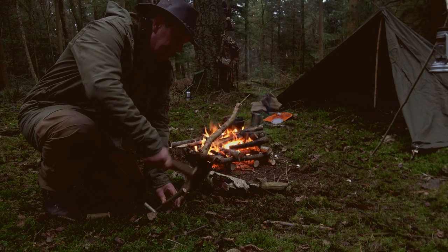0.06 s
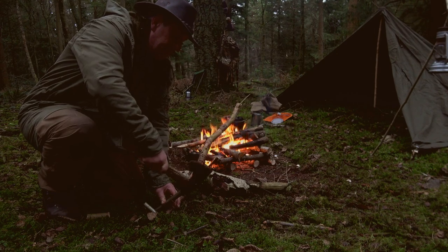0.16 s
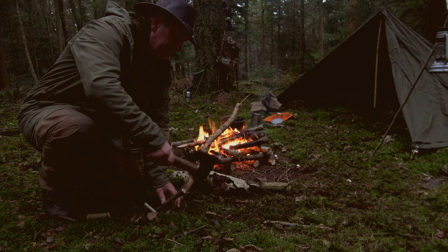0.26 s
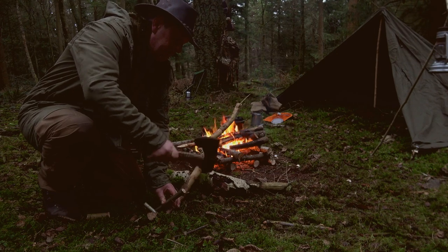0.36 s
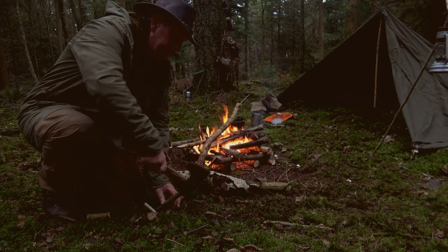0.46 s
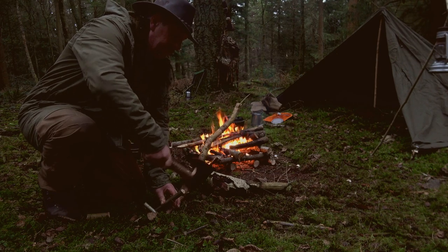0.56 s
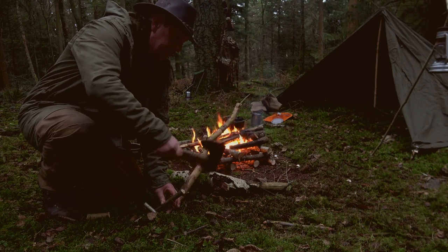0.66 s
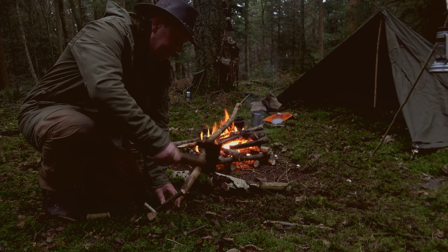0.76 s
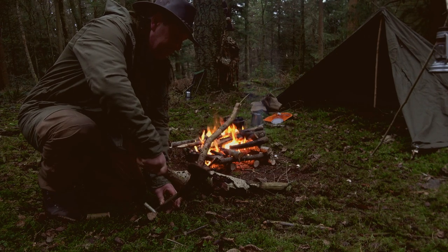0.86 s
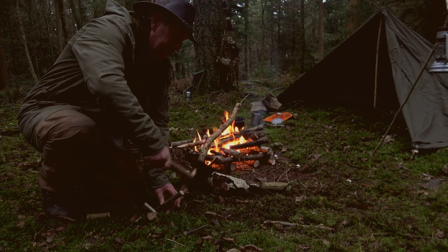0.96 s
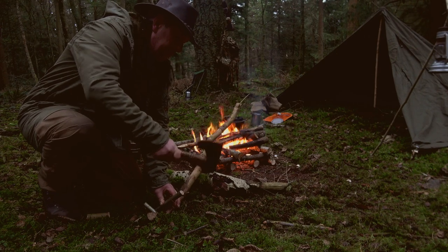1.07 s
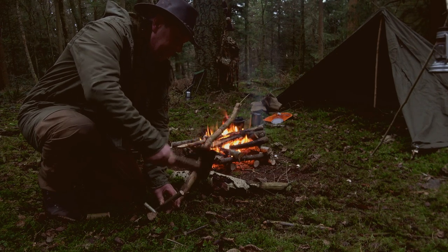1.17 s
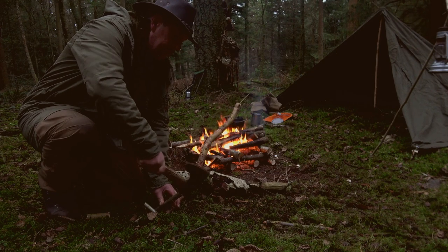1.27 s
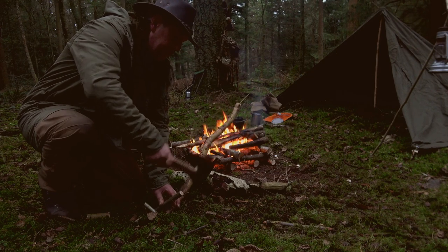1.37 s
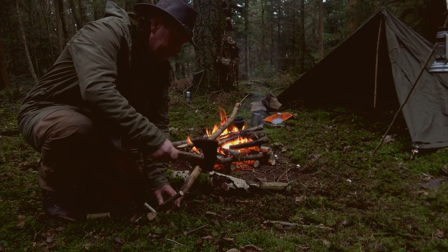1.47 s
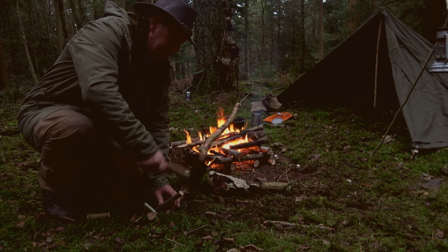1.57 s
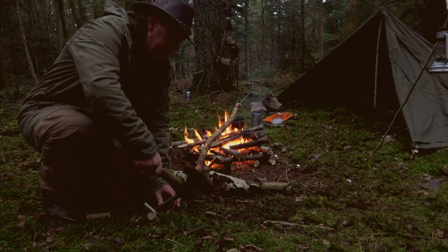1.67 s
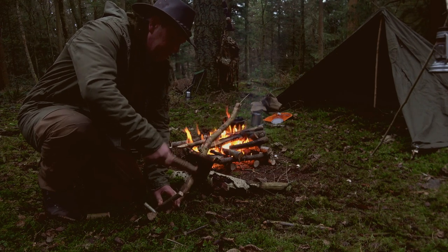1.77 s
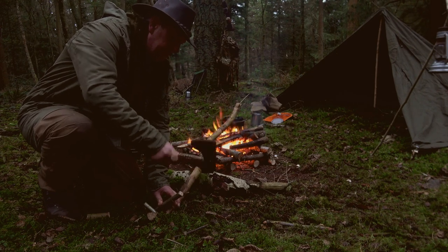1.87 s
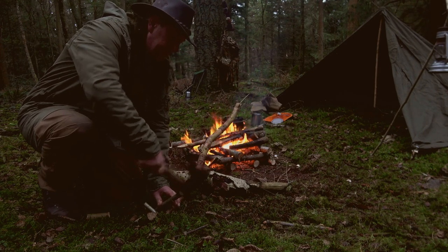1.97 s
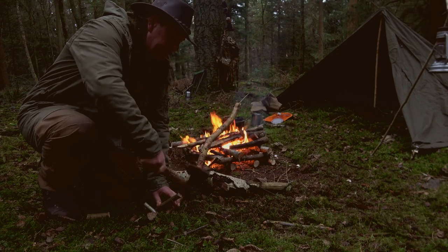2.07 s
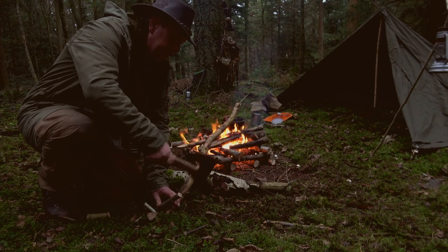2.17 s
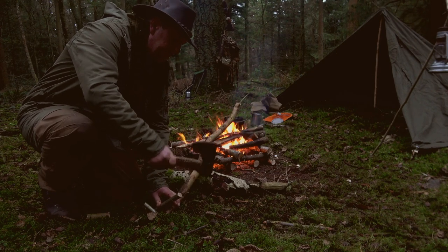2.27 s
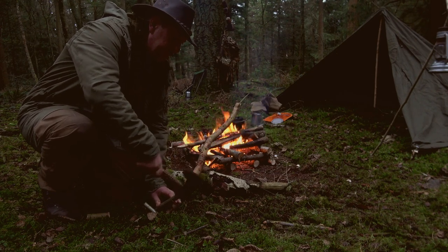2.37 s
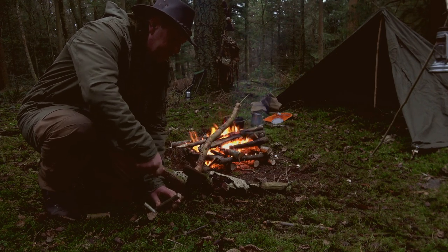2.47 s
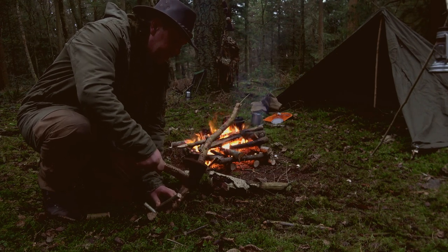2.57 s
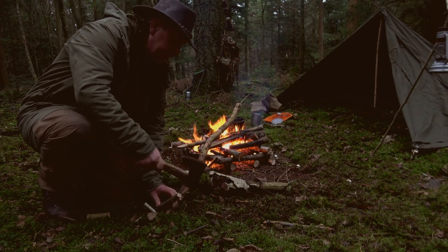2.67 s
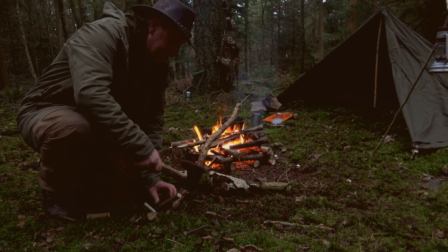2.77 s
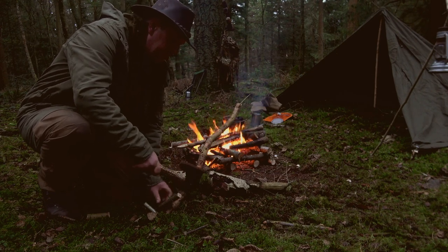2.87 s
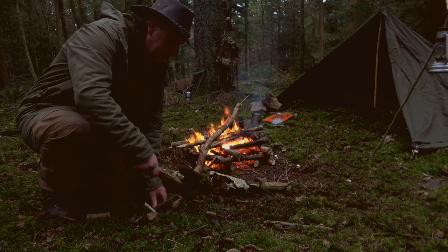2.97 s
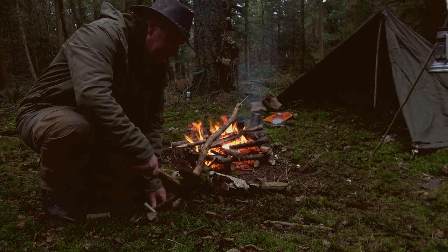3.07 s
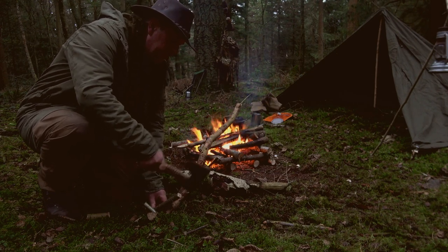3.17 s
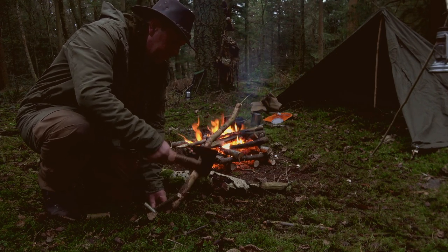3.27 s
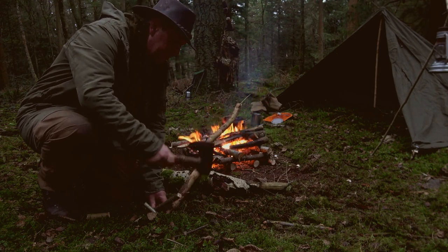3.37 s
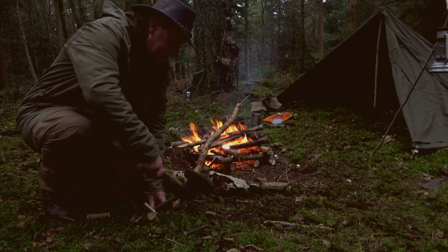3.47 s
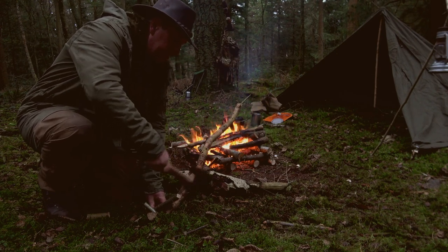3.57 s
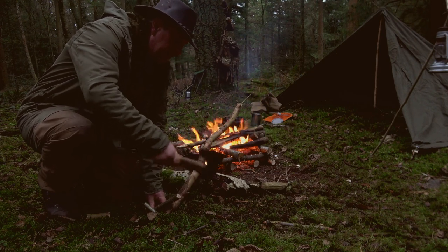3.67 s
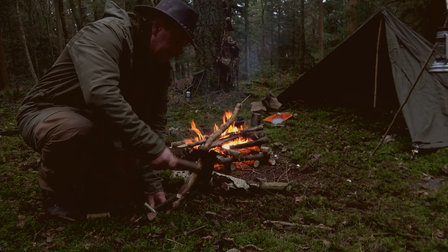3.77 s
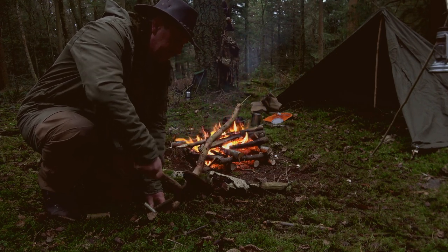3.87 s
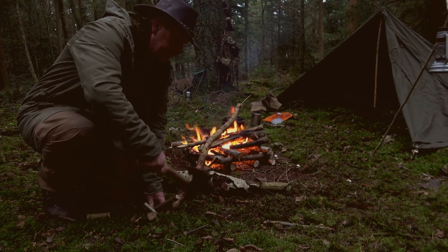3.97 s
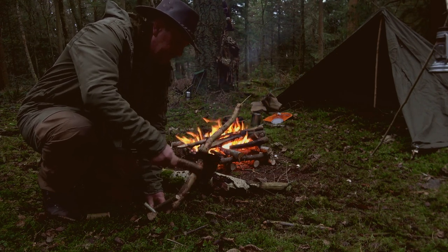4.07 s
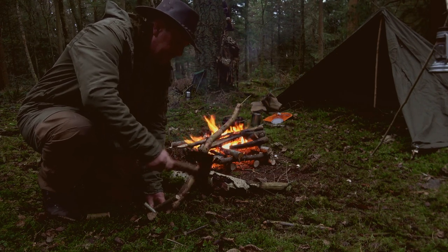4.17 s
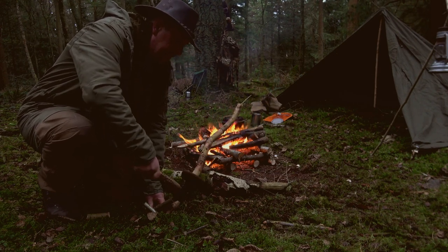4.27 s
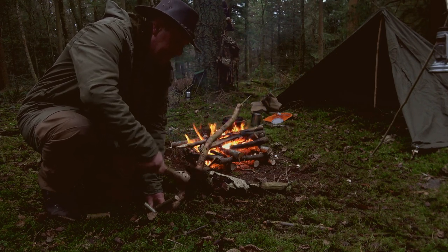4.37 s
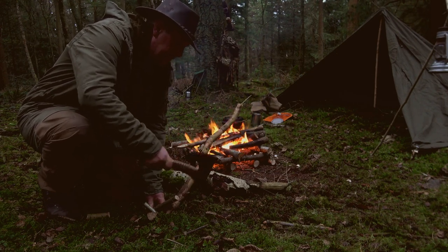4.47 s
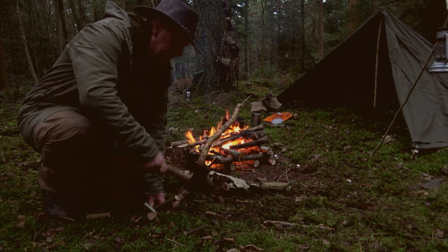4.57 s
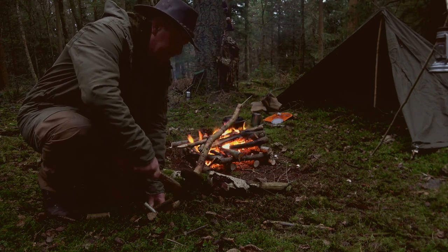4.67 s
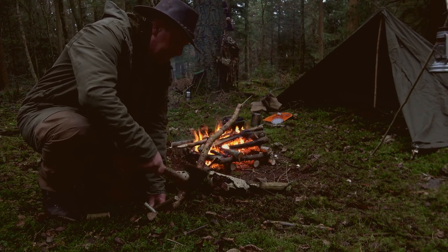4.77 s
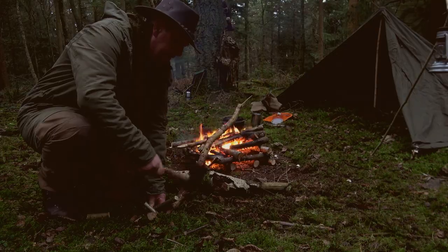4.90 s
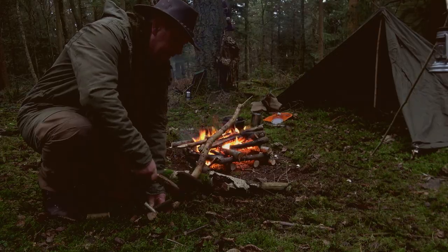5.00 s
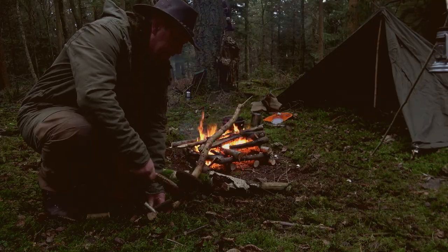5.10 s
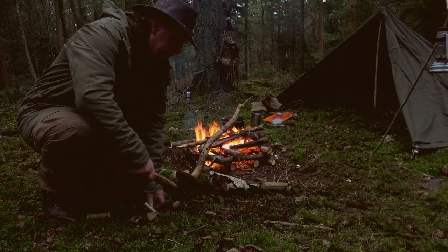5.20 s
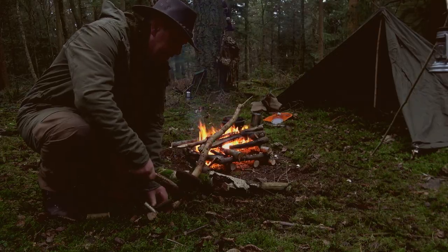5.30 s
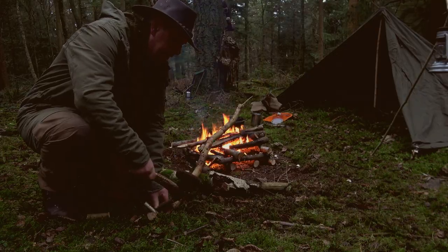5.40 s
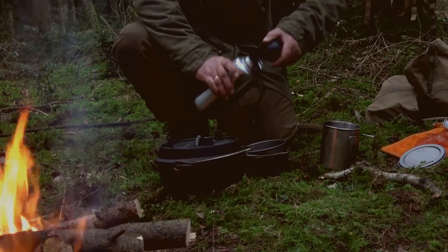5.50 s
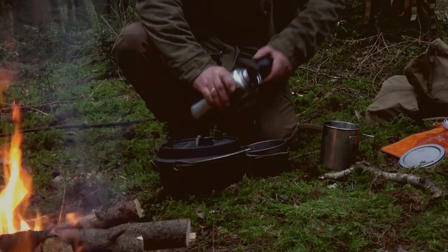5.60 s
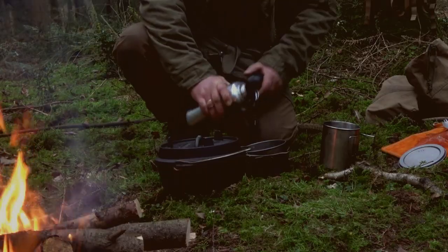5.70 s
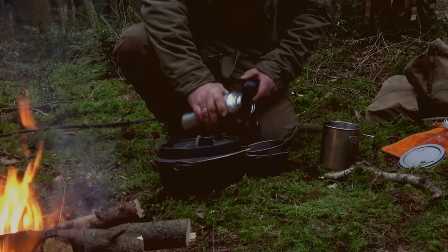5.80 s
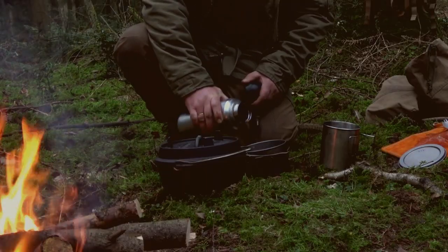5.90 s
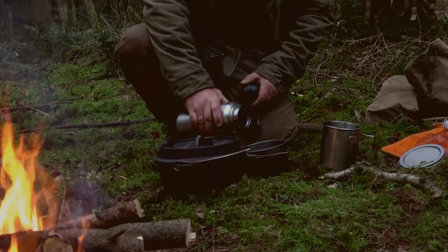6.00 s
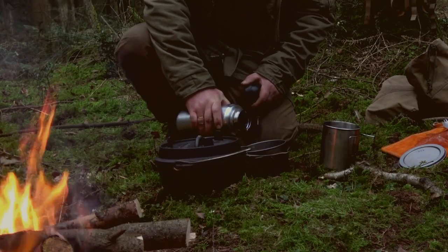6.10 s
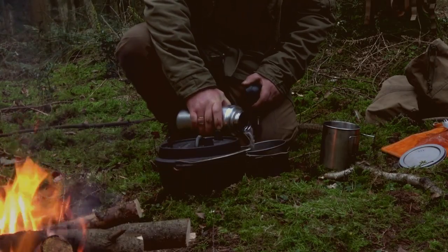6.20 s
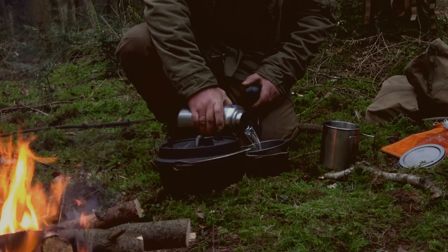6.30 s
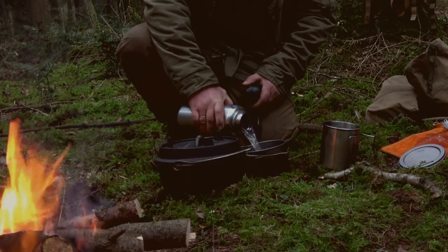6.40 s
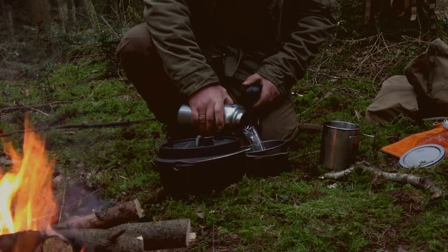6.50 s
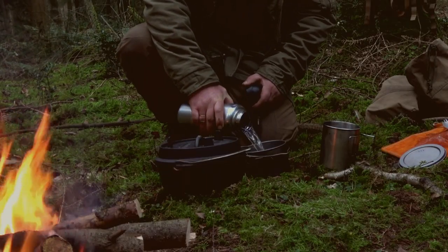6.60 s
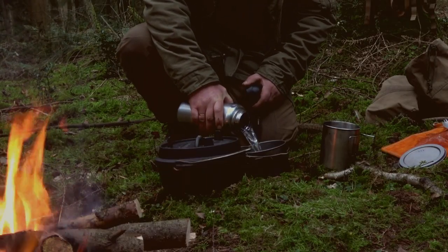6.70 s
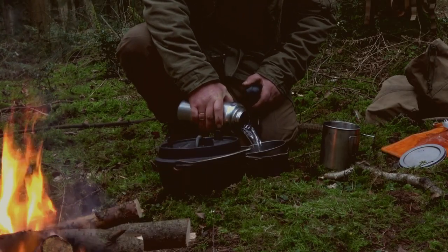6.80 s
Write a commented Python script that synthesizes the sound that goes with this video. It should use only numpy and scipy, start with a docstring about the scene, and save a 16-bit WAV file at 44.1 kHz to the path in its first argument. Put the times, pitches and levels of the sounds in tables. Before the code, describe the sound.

Close by in a quiet forest, a hatchet chops a stick against a log: seven quick blows, a pause, then five more. Each is a sharp wooden crack with a dull thud from the ground. A campfire hisses and pops softly throughout, and wind rumbles on the microphone early on. Near the end the background grows louder, a flask stopper knocks twice and water begins splashing into a pan.

```python
"""A camp fire hisses and pops as steam escapes from the wood, and wind rumbles on the microphone.
Almost at once a hatchet starts to chop a stick against a log: seven blows, a pause, then five more.
Each blow rings stick and log, tears fibres, scatters chips and sends a low thud through the forest soil.
From about 3 seconds, clothes and gear bump softly. At about 5.5 seconds the air and the fire's hiss grow
louder, a flask's stopper knocks twice, and right at the end water starts to splash into a pan."""
import sys
import numpy as np
from scipy import signal
from scipy.fft import rfft, irfft, next_fast_len
from scipy.io import wavfile
from scipy.ndimage import map_coordinates

SR = 44100
rng = np.random.default_rng(int(sys.argv[2]) if len(sys.argv) > 2 else 0)


def int16_out(signal):
    """Quantize to a 16-bit WAV file."""
    q = np.round(np.clip(np.atleast_2d(signal).T, -1, 1) * 32767)
    wavfile.write(sys.argv[1], SR, q.astype(np.int16))


N = 302085
AGE = np.arange(SR // 5) / SR   # seconds since the start of a short sound

# The background. Each row: time in seconds, level of the forest air in dB, level of the fire's hiss in dB.
BACKGROUND_LEVELS = [(0, -55, -61), (1.5, -53.5, -59), (3.4, -53.5, -57.5), (5.53, -55, -58.5),
                     (5.57, -49, -55.5), (6.85, -48.5, -55.5)]
# The gusts. Each row: time in seconds, relative strength in dB.
GUSTS = [(0, -46.5), (0.55, -43.5), (0.8, -39), (1.0, -42), (1.3, -36), (1.58, -41.5), (1.85, -27.5),
         (2.15, -40), (2.9, -46), (3.2, -43), (4.8, -59), (6.85, -61.5)]
# The tone of air, hiss and wind. Each row: frequency in Hz, relative level in dB.
AIR_TONE = [(40, -4.5), (90, 8.5), (160, 4.5), (310, -3), (500, -3), (850, -2), (1250, -1.5), (1500, -10),
            (2400, -13.5), (4000, -39.5), (16000, -61.5)]
HISS_TONE = [(1000, -32.5), (2500, -10), (4000, -4.5), (5500, -4.5), (7200, -4.5), (10000, -6.5),
             (13000, -10), (16000, -8.5)]
WIND_TONE = [(10, -1), (22, -11.5), (35, -5), (55, -20), (85, -24.5), (130, -39.5), (250, -47.5),
             (600, -86)]
# How alike left and right are. Each row: frequency in Hz, likeness from 0 (unrelated) to 1 (the same).
STEREO_LIKENESS = [(50, 0.71), (150, 0.19), (400, 0.36), (1000, 0.74), (2400, 0.22), (6000, 0.15),
                   (14000, 0)]
# Steam singing out of the wood. Each row: time in seconds, level in dB, pitch in Hz.
STEAM_SONG = [(0, -80, 5000), (1.6, -71, 4960), (2.3, -83, 7400), (3.1, -78.5, 7700), (4.9, -70, 7690),
              (5.5, -83, 7620), (5.6, -65.5, 7020), (6.85, -69, 6990)]
# The fire's loud pops, and a few sharp clicks played the same way (two of them at the stopper's knocks). Each
# row: start in seconds, level in dB, pitch in Hz.
POPS_AND_CLICKS = [(0.3538, -44, 6650), (0.467, -43, 2300), (1.1355, -41.5, 7100), (2.0042, -32.5, 9000),
                   (2.3782, -34.5, 5650), (2.8332, -42.5, 8300), (2.8729, -48.5, 2570), (3.1706, -42.5, 5900),
                   (3.209, -47, 5800), (3.318, -33.5, 7000), (3.449, -43.5, 5500), (3.7777, -35.5, 6500),
                   (4.1339, -36.5, 7800), (4.509, -43.5, 9250), (5.5607, -42, 5100), (5.721, -42, 5060),
                   (5.7515, -42, 4130), (5.8629, -45, 5100), (6.169, -46.5, 5480), (6.225, -32.5, 5540),
                   (6.3415, -43.5, 6660), (6.4244, -26.5, 6770), (6.431, -41, 7300)]
# The hatchet blows. Each row: start in seconds, force (the level of the stick's ring) in dB,
# stick pitch in Hz, bend level in dB, log level in dB, log pitch in Hz, bite level in dB,
# crack level in dB, crack pitch in Hz, fibre snap level in dB.
HATCHET_BLOWS = [(0.191, -16.5, 1223, -22, -21.5, 259, -21, -23.5, 2890, -28),
                 (0.556, -16, 1175, -27.5, -22, 282, -18, -23, 4240, -30.5),
                 (0.9213, -12.5, 1215, -26, -23, 266, -15.5, -19.5, 4470, -37),
                 (1.3207, -14.5, 1187, -28, -24, 410, -23, -21, 4500, -26),
                 (1.692, -22, 960, -32.5, -21.5, 406, -28.5, -35, 4620, -21),
                 (2.072, -13, 1213, -27, -28, 275, -21.5, -23, 4060, -29),
                 (2.4653, -16.5, 1050, -27.5, -23, 280, -24.5, -28, 3330, -44),
                 (3.55, -14, 1280, -35, -23, 264, -16, -21, 2660, -25),
                 (3.9311, -13, 1314, -24.5, -26, 236, -16, -13.5, 3460, -34.5),
                 (4.3353, -15, 1287, -22, -24.5, 247, -15.5, -20, 3100, -32.5),
                 (4.7081, -20.5, 1310, -21.5, -23, 382, -18, -28.5, 4400, -38.5),
                 (5.0566, -18, 1350, -21, -22, 326, -22, -24, 3200, -26)]
# The modes (natural notes) of the bending stick, the struck stick and the log.
# Each row: multiple of the pitch, relative level in dB, seconds to fade by 60 dB.
BEND_MODES = [(1, 6, 0.021), (.88, -23, 0.031)]
STICK_MODES = [(1, 4, 0.014), (1.4, -22.5, 0.016), (1.2, -0.5, 0.022)]
LOG_MODES = [(1, 11.5, 0.035), (.7, -11, 0.045), (1.55, -5.5, 0.023)]
# The blade biting in. Each row: frequency in Hz before tuning, relative level in dB, seconds to fade.
BITE_MODES = [(2137, 15.5, 0.0086), (2140, -19.5, 0.0069), (1498, 1.5, .025), (2850, -39, 0.0013)]
# The tone of the cut cracking. Each row: multiple of the crack's pitch, relative level in dB.
CRACK_TONE = [(.35, -21), (.7, -3.5), (0.999, 7.5), (1.3, -2.5), (1.7, -4), (2.4, -17.5), (3.5, -34),
              (5, -48)]
# The tone of rattling wood and snapping fibres. Each row: frequency in Hz, relative level in dB.
RATTLE_TONE = [(120, -20.5), (280, 5), (450, 0), (600, 5), (850, -8), (1200, -9.5), (1550, -2.5),
               (1750, -4.5), (2050, -1.5), (2700, -17), (7000, -23), (15000, -33.5)]
SNAP_TONE = [(800, 11), (2500, -7), (4300, -2.5), (6500, 9), (8500, -2), (12000, -7.5), (16000, -17)]
# A last splinter gives way. Each row: start in seconds, level in dB.
LAST_SPLINTERS = [(0.939, -40.5), (1.3443, -30.5)]
# The stick bounces on the log. Each row: start in seconds, level in dB.
STICK_BOUNCES = [(.9335, -22.5), (2.0795, -29.5), (2.0848, -27.5)]
# The bouncing stick's notes. Each row: frequency in Hz, relative level in dB, seconds to fade by 60 dB.
BOUNCE_MODES = [(642, -16.5, .05), (740, 17, 0.046), (1146, 13.5, 0.0425), (1200, -3.5, 0.055),
                (1535, -7, 0.062), (2090, -13, 0.0309)]
# Bumps of clothes and handled things. Each row: start in seconds, level in dB.
SOFT_BUMPS = [(3.145, -39), (4.14, -41.5), (5.683, -40), (6.116, -43.5), (6.586, -48), (6.651, -39.5)]
# The tone of those bumps. Each row: frequency in Hz, relative level in dB.
BUMP_TONE = [(30, 6), (60, 5), (180, -1), (280, -8.5), (500, -12), (1500, -16), (6000, -33)]
# The stopper knocks on the flask. Each row: start in seconds, level in dB.
FLASK_KNOCKS = [(5.723, -45), (5.7521, -36.5)]
# The notes of stopper and pan. Each row: frequency in Hz, relative level in dB, seconds to fade by 60 dB.
STOPPER_MODES = [(143, 6.5, 0.025), (520, -5, 0.028), (780, -12, .025), (1130, 14, 0.0075),
                 (1720, -8, .012)]
PAN_MODES = [(740, -4, 0.042), (1160, -10, 0.035), (1775, -2, 0.024)]
# Water spattering on the pan. Each row: time in seconds, level in dB.
SPATTER_LEVELS = [(6.5, -110), (6.57, -92), (6.61, -62), (6.85, -50.5)]
# The tone of the echo from the trees. Each row: frequency in Hz, relative level in dB.
ECHO_TONE = [(100, 2), (1000, 5), (2000, 3), (3400, 0.5), (6500, 5.5), (15000, -5.5)]


def from_db(db):
    """Turn decibels into a number to multiply by."""
    return 10 ** (np.asarray(db) / 20)


def rms_one(x):
    """Scale a sound so that its average strength (rms) is 1."""
    return x / np.sqrt(np.mean(x ** 2) + 1e-20)


def at_level(x, db):
    """Give a short sound the energy of 5 ms at this level."""
    return x * from_db(db) * np.sqrt(.005 * SR / (np.sum(x ** 2) + 1e-20))


def in_time(rows):
    """Join a table's rows with straight lines, giving each column a value at every sample."""
    times, *columns = np.transpose(rows)
    return [np.interp(np.arange(N) / SR, times, column) for column in columns]


def at_hz(points, hz):
    """Read between a table's frequencies, with octaves evenly spaced."""
    known_hz, values = np.transpose(points)
    return np.interp(np.log(hz + 1), np.log(known_hz), values)


def add(track, start_s, sound):
    """Mix a short sound into a track."""
    i = max(round(start_s * SR), 0)
    track[i:i + len(sound)] += sound[:max(N - i, 0)]


def fade(t60):
    """Die away by 60 dB every t60 seconds; 1 - fade makes a soft start."""
    return from_db(-60 * AGE / t60)


def burst(t60):
    """A dying burst of noise."""
    return rng.standard_normal(len(AGE)) * fade(t60)


def waver(depth_db, count):
    """A multiplier that wanders through count random values over the scene."""
    wander = np.interp(np.linspace(0, count - 1, N), np.arange(count), rng.standard_normal(count))
    return from_db(depth_db * wander)


def tint(x, tone):
    """Give a sound this tone without smearing it ahead of its start (a minimum-phase filter)."""
    size = 2 * next_fast_len(len(x))
    gains = from_db(at_hz(tone, np.fft.rfftfreq(size, 1 / SR)))
    cepstrum = irfft(np.log(gains))
    cepstrum[1:size // 2] *= 2
    response = np.exp(rfft(cepstrum[:size // 2], size))
    return irfft(rfft(x, size) * response)[:len(x)]


def band(x, centre_hz, spread):
    """Favour the frequencies from centre / spread to centre * spread."""
    edges = np.minimum([centre_hz / spread, centre_hz * spread], [.4 * SR, .45 * SR])
    return signal.sosfilt(signal.butter(1, edges, "band", fs=SR, output="sos"), x + 1e-18)


def steady_noise(tone):
    """Even stereo noise with this tone, partly alike on the left and right."""
    hz = np.fft.rfftfreq(2 * next_fast_len(N // 2 + 1), 1 / SR)
    mid, side = rng.standard_normal((2, len(hz))) + 1j * rng.standard_normal((2, len(hz)))
    alike = at_hz(STEREO_LIKENESS, hz)
    both = np.sqrt(1 + alike) * mid + np.sqrt(1 - alike) * side * [[1], [-1]]
    return rms_one(irfft(both * from_db(at_hz(tone, hz)))[:, :N])


def ticks(per_s, uneven_db, low_hz, high_hz, ringing):
    """Tiny random clicks of uneven size, each ringing at one of 20 pitches."""
    sizes = from_db(uneven_db * np.minimum(rng.exponential(1, N), 4)) * rng.choice([-1, 1], N)
    clicks = sizes * (rng.random(N) < per_s / SR)
    pitches = np.geomspace(low_hz, high_hz, 20)
    chosen = rng.integers(0, 20, N)
    return rms_one(sum(band(clicks * (chosen == k), hz, 1 + 1 / ringing) for k, hz in enumerate(pitches)))


def ring(modes, pitch=1, vary_db=2.0, detune=.02):
    """A struck thing's fading notes; each hit lands elsewhere, shifting levels and pitches a little."""
    out = np.zeros(len(AGE))
    for frequency, db, t60 in modes:
        level_luck, pitch_luck = rng.standard_normal(2)
        hz = pitch * frequency * (1 + detune * pitch_luck)
        out -= from_db(db - vary_db * level_luck) * fade(t60) * np.sin(2 * np.pi * hz * AGE)
    return out


def air_and_hiss():
    """Forest air murmurs, a little louder on the left, under the fire's flickering hiss."""
    air_db, hiss_db = in_time(BACKGROUND_LEVELS)
    air = from_db(air_db) * steady_noise(AIR_TONE) * from_db([[.9], [-.9]])
    hiss = from_db(hiss_db) * steady_noise(HISS_TONE) * waver(depth_db=1.9, count=160)
    return air + hiss


def wind(boost_db=6.0, left_db=3):
    """Gusts buffet each side of the microphone on its own, the left a little more."""
    gust_db, = in_time(GUSTS)
    side_db = left_db / 2 * np.array([[1], [-1]])
    eddies = np.array([waver(depth_db=4.0, count=70) for side in range(2)])
    return from_db(gust_db + boost_db + side_db) * eddies * steady_noise(WIND_TONE)


def sizzle(flutter_hz=450):
    """Steam sings out of the wood in a sputtering note whose pitch creeps as the wood dries."""
    db, hz = in_time(STEAM_SONG)
    flutter = signal.sosfilt(signal.butter(2, flutter_hz, fs=SR, output="sos"), rng.standard_normal(N))
    creep = waver(depth_db=.35, count=90)
    note = np.sin(2 * np.pi * np.cumsum(hz * creep) / SR)
    return from_db(db) * rms_one(flutter * note * waver(depth_db=-1.0, count=220))


def small_pops(per_s=4, db=-52.5, vary_db=4, hz=6180, vary_octaves=0.32):
    """Rows like POPS_AND_CLICKS for faint pops, one at a random moment in each equal stretch of time."""
    chance = rng.uniform(-0.69, 1, (int(per_s * N / SR), 3))
    return [((k + .5 + when / 2) / per_s, db + vary_db * size, hz * 2 ** (vary_octaves * pitch))
            for k, (when, size, pitch) in enumerate(chance)]


def fire(tail_db=-28, wood_db=-10, wood_hz=1800, crackle_db=-69):
    """Pockets of steam burst in the burning wood, over a fine crackle; a few other sharp clicks sound the same
    way."""
    out = from_db(crackle_db) * ticks(per_s=48, uneven_db=1.0, low_hz=2800, high_hz=10240, ringing=0.63)
    for start, db, hz in POPS_AND_CLICKS + small_pops():
        snap = burst(t60=0.0035) + from_db(tail_db) * burst(t60=0.11)
        pocket = band(snap, hz, spread=1.37)
        wood = from_db(wood_db) * band(snap, wood_hz, spread=1.08)
        add(out, start, at_level(band(pocket - wood, hz, spread=6.8), db))
    return out


def blade_strike(modes, pitch, stutter_t60, stutter=0.26):
    """The blade's first touch, then its stuttering way in, sets the wood ringing."""
    force = stutter * burst(stutter_t60)
    force[0] = 1
    ringing = signal.fftconvolve(force, ring(modes, pitch))[:len(AGE)]
    # little sound is kept below the main note
    low_cut = signal.butter(2, 0.45 * pitch * modes[0][0], "high", fs=SR, output="sos")
    return signal.sosfilt(low_cut, ringing)


def cut_crack(hz):
    """The cut cracks open: a very short noise, strongest around this pitch."""
    tone = [(multiple * hz, db) for multiple, db in CRACK_TONE]
    return tint(burst(t60=0.0088) * (1 - fade(t60=0.0013)), tone)


def log_knock(hz, contact_s=0.0012):
    """The heavy log answers softly, because the contact gives and spreads out the push."""
    push = np.sin(np.pi * np.minimum(AGE / contact_s, 1))
    return signal.fftconvolve(ring(LOG_MODES, hz), push)[:len(AGE)]


def fibre_snap(db):
    """A bundle of fibres parts with a bright tick."""
    return at_level(tint(burst(t60=0.0055), SNAP_TONE), db)


def follow_force(force_db, usual_db, share):
    """A level that is usual_db on an ordinary blow (-16 dB) and follows a share of any change in force."""
    return usual_db + share * (force_db + 16)


def hatchet(bend_hz=668, log_lag_s=0.002425):
    """Each blow bends and rings the stick, cracks the cut, knocks the log and leaves the wood rattling."""
    out = np.zeros(N)
    for blow in HATCHET_BLOWS:
        start, force_db, stick_hz, bend_db, log_db, log_hz, bite_db, crack_db, crack_hz, snap_db = blow
        bend = blade_strike(BEND_MODES, bend_hz, stutter_t60=0.017, stutter=0.13)
        stick = blade_strike(STICK_MODES, stick_hz, stutter_t60=0.0087)
        bite = blade_strike(BITE_MODES, pitch=0.942, stutter_t60=0.012)
        add(out, start, at_level(bend, bend_db) + at_level(stick, force_db) + at_level(bite, bite_db))
        # the stick takes a moment to press on the log
        add(out, start + log_lag_s, at_level(log_knock(log_hz), log_db))
        add(out, start + 0.00023, at_level(cut_crack(crack_hz), crack_db))
        rattle = tint(burst(t60=0.077), RATTLE_TONE)
        add(out, start + 0.0054, at_level(rattle, follow_force(force_db, usual_db=-29, share=.6)))
        # fibres snap twice as the blade sinks in, the second time more weakly
        add(out, start + 0.0033, fibre_snap(snap_db))
        add(out, start + 0.006, fibre_snap(snap_db - 11.5))
    for start, db in LAST_SPLINTERS:
        add(out, start, fibre_snap(db))
    for start, db in STICK_BOUNCES:
        add(out, start, at_level(ring(BOUNCE_MODES), db))
    return out


def ground_thuds(hz=87, rise_hz_per_s=300, travel_s=0.0427, width_s=0.025, vary=0.031):
    """Each blow travels through the soil as a slow wave, its lowest part first."""
    out = np.zeros(N)
    for start, force_db, *_ in HATCHET_BLOWS:
        t = AGE - travel_s * (1 + vary * rng.normal())
        swell = np.exp(-(t / width_s) ** 2) * (1 - fade(t60=.05))
        turns = (hz * t + rise_hz_per_s * t * t / 2) * (1 + vary * rng.normal())
        gain = from_db(follow_force(force_db, usual_db=-23.5, share=.3))
        add(out, start, gain * swell * np.cos(2 * np.pi * turns))
    return out


def chips(flight_s=.035, hz=5500, below_crack_db=31.5):
    """Chips and bark patter into the moss after each blow, louder after a louder crack."""
    out = np.zeros(N)
    for start, *_, crack_db, _, _ in HATCHET_BLOWS:
        patter = burst(t60=.25) * (1 - fade(t60=0.13)) * (rng.random(len(AGE)) < .05)
        add(out, start + flight_s, at_level(band(patter, hz, spread=2.54), crack_db - below_crack_db))
    return out


def bumps():
    """Clothes and handled things make dull bumps with no sharp start."""
    out = np.zeros(N)
    for start, db in SOFT_BUMPS:
        swell = burst(t60=0.063) * (1 - fade(t60=0.032))
        add(out, start, at_level(tint(swell, BUMP_TONE), db))
    return out


def flask(first_spurt_s=6.606, spurt_gap_s=0.063, pan_rings_s=6.84):
    """The stopper knocks, water spatters and spurts, and the stream sets the pan ringing."""
    spatter_db, = in_time(SPATTER_LEVELS)
    out = from_db(spatter_db) * ticks(per_s=900, uneven_db=3, low_hz=3500, high_hz=9000, ringing=14)
    for pouring_s in spurt_gap_s * np.arange(4):
        bubble_hz = 6460 - 8000 * pouring_s   # bubbles grow and deepen as the stream thickens
        add(out, first_spurt_s + pouring_s, at_level(splash(bubble_hz), db=-41.5))
    for start, db in FLASK_KNOCKS:
        add(out, start, at_level(ring(STOPPER_MODES), db))
    add(out, pan_rings_s, at_level(ring(PAN_MODES), db=-38))
    return out


def splash(hz, t60=0.024, spread=0.137, rise_per_s=7, scatter_s=0.031, count=18):
    """A spurt traps a handful of tiny bubbles, each rising in pitch as it nears the surface."""
    age = np.maximum(AGE - scatter_s * rng.random((count, 1)), 0)
    pitch = hz * np.exp(spread * rng.standard_normal((count, 1)))
    turns = pitch * (age + rise_per_s * age ** 2 / 2)
    return np.sum(from_db(-60 * age / t60) * np.sin(2 * np.pi * turns), axis=0)


def forest_echo(x, db=-31, t60=.3):
    """Tree trunks scatter a faint, brief echo, different on each side."""
    echoes = [tint(burst(t60) * (1 - fade(t60=0.034)), ECHO_TONE) for side in range(2)]
    return from_db(db) * np.array([signal.oaconvolve(x, e / np.linalg.norm(e))[:N] for e in echoes])


def place(x, left_db, lag_samples):
    """Make a sound louder on the left and later on the right (earlier if the lag is negative)."""
    right = map_coordinates(x, [np.arange(N) - lag_samples], order=3)
    return np.array([x * from_db(left_db / 2), right * from_db(-left_db / 2)])


def scene():
    """Chopping and flask a little to the left, the fire ahead, air and wind all round."""
    chops, pops = hatchet() + chips(), fire()
    near = place(chops, left_db=2.5, lag_samples=0.96)
    near += place(pops + sizzle(), left_db=0.5, lag_samples=0.87)
    near += place(flask() + bumps(), left_db=3.0, lag_samples=1.24)
    near += place(ground_thuds(), left_db=1.0, lag_samples=-73.0)
    return near + forest_echo(chops + pops) + air_and_hiss() + wind()


def record(dry, ceiling=0.7, cutoff_hz=15850):
    """Round off the tallest peaks and cut the highest treble."""
    rounded = dry / (1 + (dry / ceiling) ** 4) ** (1 / 4)
    return signal.sosfilt(signal.ellip(10, .1, 80, cutoff_hz, fs=SR, output="sos"), rounded)


dry = scene()
out = record(dry)
int16_out(out)
```